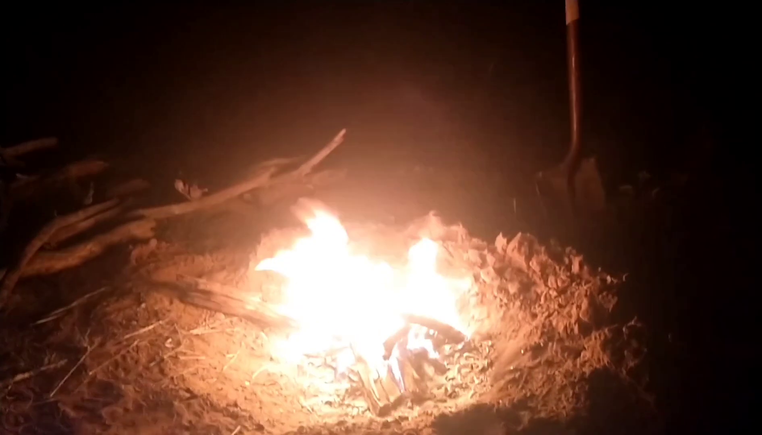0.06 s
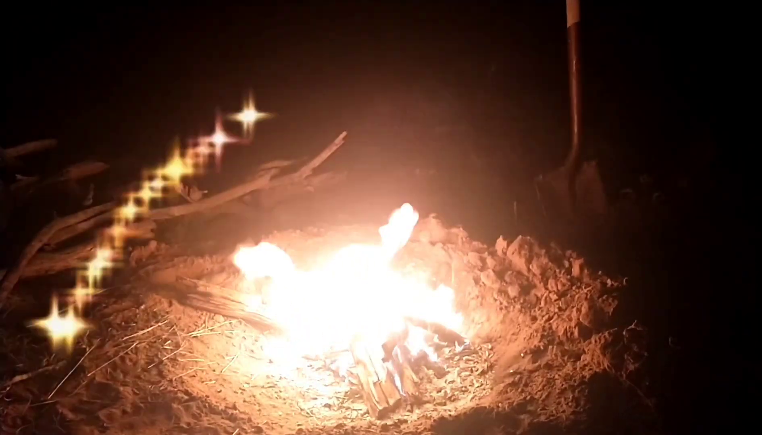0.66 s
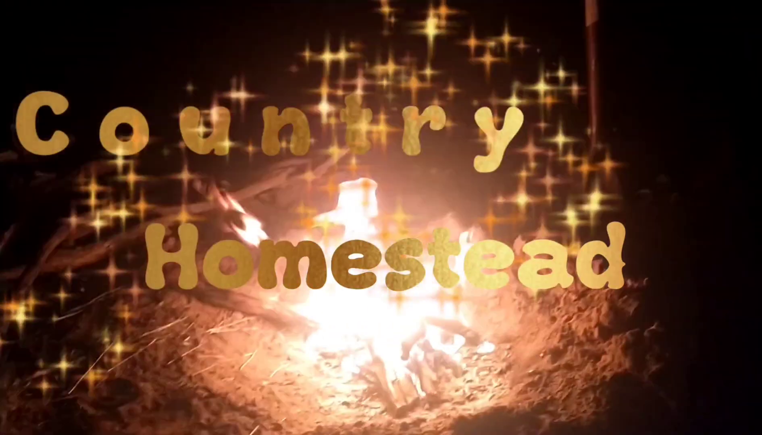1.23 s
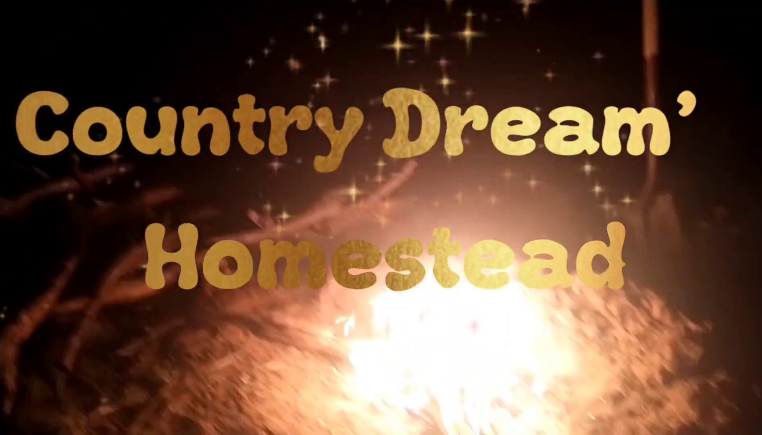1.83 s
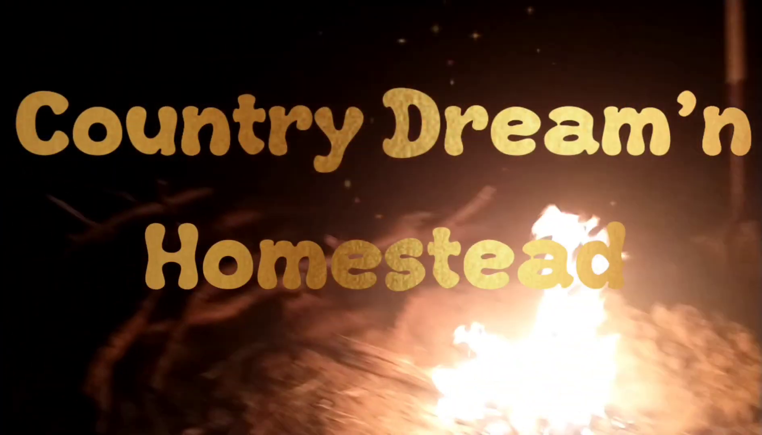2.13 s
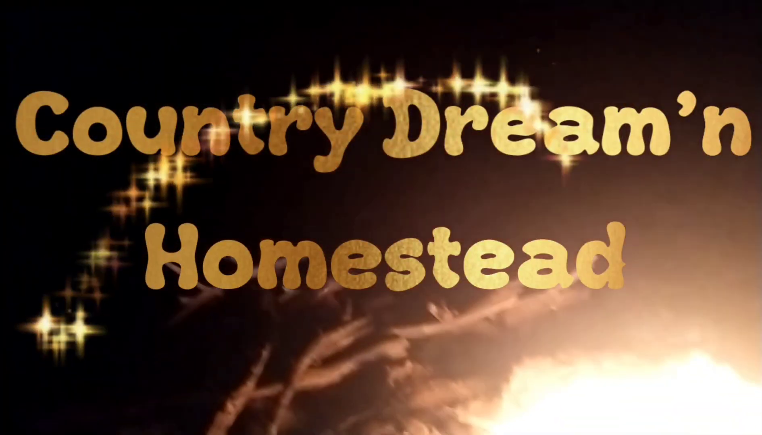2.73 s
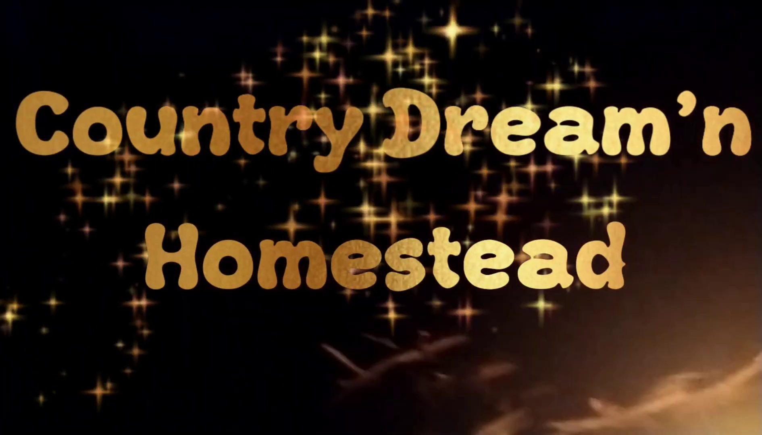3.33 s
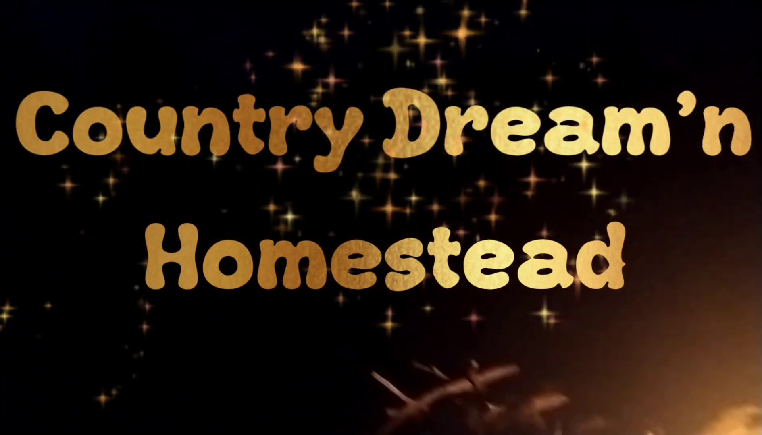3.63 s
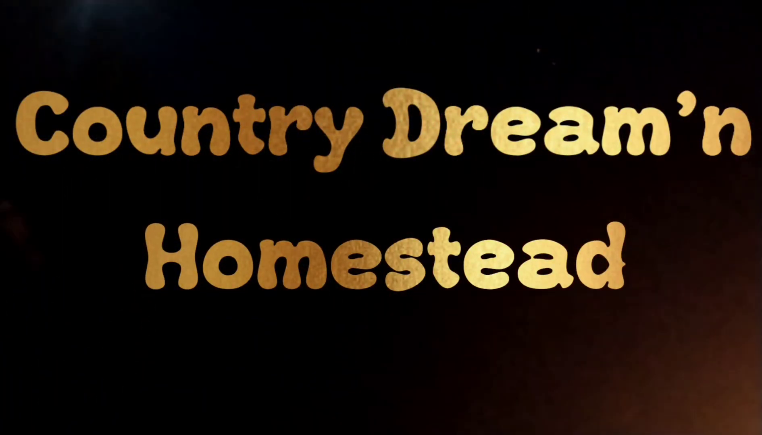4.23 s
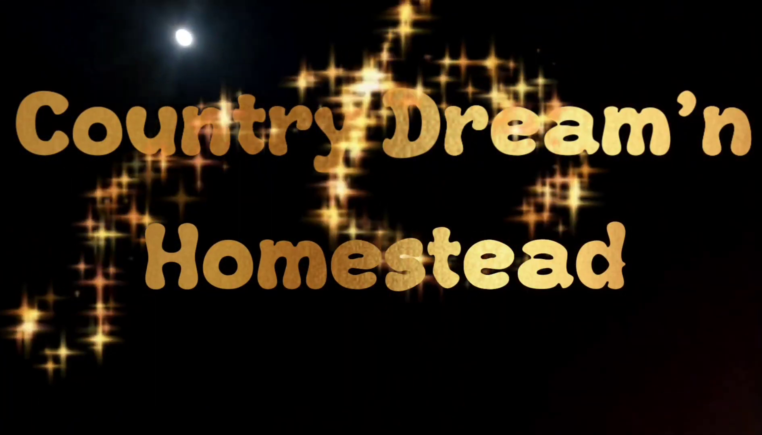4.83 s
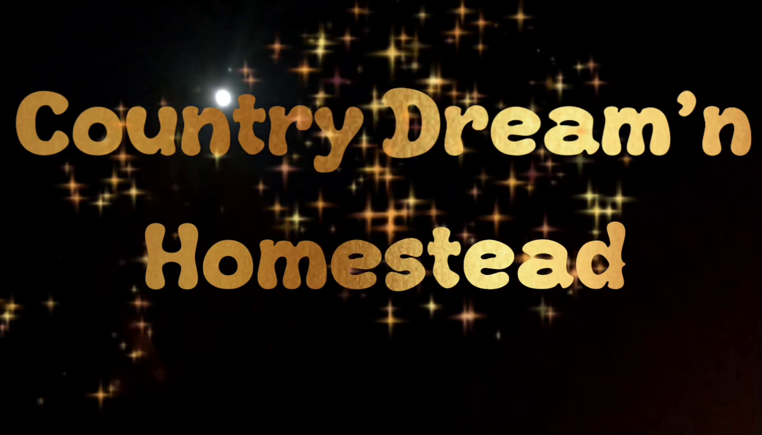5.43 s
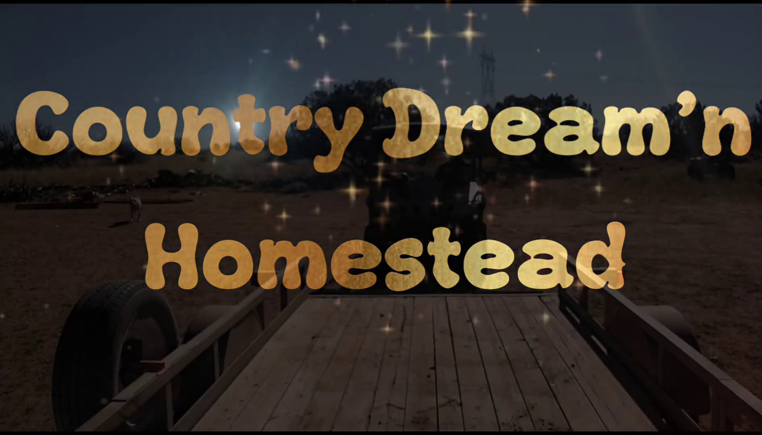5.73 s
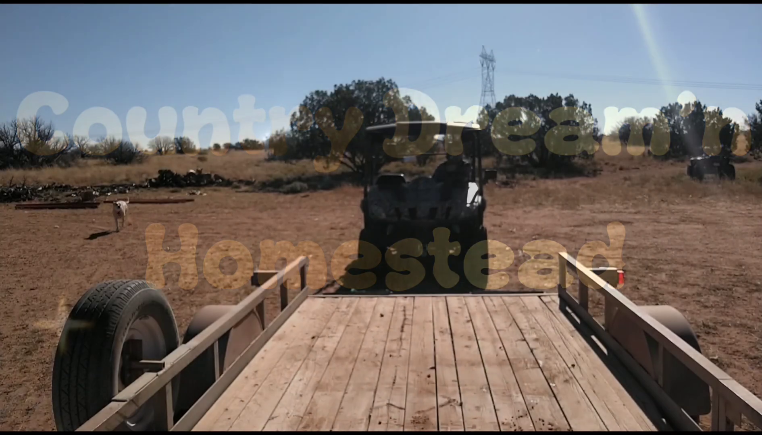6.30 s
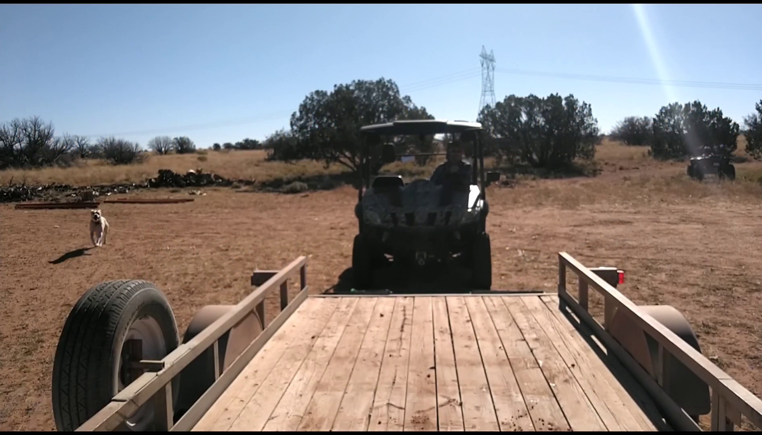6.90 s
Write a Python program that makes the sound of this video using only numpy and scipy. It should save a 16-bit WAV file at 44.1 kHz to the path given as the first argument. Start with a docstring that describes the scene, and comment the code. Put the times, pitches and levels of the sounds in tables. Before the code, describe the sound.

Crickets trill in a steady, high chorus outdoors at night while a small campfire flutters softly and gives scattered faint snaps. Midway, a few light knocks come through the microphone's casing. Near the end the crickets and fire fade as a utility cart creeps closer from straight ahead, its engine puttering and rattling, tyres grinding on dirt, and its brakes giving short, louder groans with thin squeaks.

```python
"""Tree crickets trill in chorus at night, each wing stroke a short falling tone.
A small campfire flutters as gas burns, hisses softly and snaps as sap pockets burst.
Light knocks come through the camera's casing, air nudges its microphones and a faint whistle sinks.
The night fades into a utility cart creeping closer: its engine putters, its tyres grind on dirt
and its brakes groan and squeak."""
import sys
import numpy as np
from scipy import signal
from scipy.fft import rfft, irfft, next_fast_len
from scipy.io import wavfile
from scipy.ndimage import map_coordinates

SR = 44100
rng = np.random.default_rng(int(sys.argv[2]) if len(sys.argv) > 2 else 0)


def bounce(signal):
    """Save signal as a 16-bit WAV file at the path given by the first command-line argument."""
    frames = np.transpose(np.atleast_2d(signal))
    limited = np.clip(frames, -1, 1)
    pcm = np.round(limited * 32767).astype(np.int16)
    wavfile.write(sys.argv[1], SR, pcm)


N = 306869
T = np.arange(N) / SR
START_S, THROTTLE_S = .13, 6.19  # the night sounds begin; the cart starts to roll
SWING_S = (3.6, 4.6)  # the camera swings away from the fire (from, to)
TOP_HZ = 15500

# Stereo width: how strong the side (what differs between the ears) is next to the mid (what they share).
# the fire sounds wide: (frequency [Hz], side over mid [dB])
FIRE_WIDTH = [(60, -8.5), (180, -11), (550, -5.5), (1650, -2.5), (4970, 0), (15000, 0.5)]
# the cart is straight ahead: (frequency [Hz], side over mid [dB])
CART_WIDTH = [(1000, -71)]


def amp(db):
    """Turn decibels into a gain."""
    return 10 ** (np.asarray(db) / 20)


def unit(x):
    """Scale a sound to an average (rms) level of 1."""
    return x / np.sqrt(np.mean(x ** 2) + 1e-20)


def along(points, hz):
    """Read between (frequency, value) points on a log frequency axis."""
    freqs, values = np.transpose(points)
    return np.interp(np.log(hz + 1), np.log(freqs + 1), values)


def swell(s, half):
    """A bell-shaped rise and fall around time s; half is its half length in seconds."""
    return np.exp(-.5 * np.minimum(((T - s) / half) ** 2, 100))


def ramp(start, end):
    """A straight rise from 0 to 1 between two times."""
    return np.clip((T - start) / max(end - start, 1e-3), 0, 1)


def between(pair, share):
    """Move from the first value of a pair to the second."""
    return pair[0] + (pair[1] - pair[0]) * share


def wobble(rate):
    """A smooth curve through `rate` random values a second."""
    return map_coordinates(rng.standard_normal(int(N * rate / SR) + 4), [T * rate])


def sine(hz):
    """A tone that follows a pitch curve."""
    return np.sin(2 * np.pi * np.cumsum(hz) / SR)


def filtered(x, response):
    """Multiply each frequency in x by response(hz)."""
    size = next_fast_len(N + 8192)
    return irfft(rfft(x, size) * response(np.fft.rfftfreq(size, 1 / SR)), size)[..., :N]


def noise(spectrum, width):
    """Stereo noise with a given tone colour and width."""
    lo, hi = spectrum[0][0], spectrum[-1][0]
    roll_off = lambda hz: np.minimum(1, hz / lo) ** 2 * np.minimum(1, hi / (hz + 1)) ** 2
    colour = lambda hz: amp(along(spectrum, hz) + np.outer([0, 1], along(width, hz))) * roll_off(hz)
    mid, side = filtered(rng.standard_normal((2, N)), colour)
    return np.array([mid + side, mid - side]) / np.std(mid)


def puffs(rows, width):
    """Short swells of noise, each about an octave wide."""
    return sum(amp(db) * swell(s, half) * noise([(hz / 2, -10), (hz, 0), (2 * hz, -12)], width)
               for s, hz, db, half in rows)


def ring_of(spectrum, size=16384):
    """How something with this tone colour rings after one tap."""
    cepstrum = irfft(np.log(amp(along(spectrum, np.fft.rfftfreq(size, 1 / SR))) + 1e-6))
    cepstrum[1:size // 2] *= 2  # folded forward, so nothing sounds before the tap
    cepstrum[size // 2 + 1:] = 0
    return irfft(np.exp(rfft(cepstrum)))


def panned(x, pan_db):
    """Place a sound at constant power; positive pan_db is to the left."""
    gains = np.array([amp(pan_db / 2), amp(-pan_db / 2)]).reshape(2, -1)
    return x * gains / np.sqrt(np.mean(gains ** 2, axis=0))


def add(track, s, sound):
    """Mix a short sound in at time s."""
    part = track[round(s * SR):][:len(sound)]
    part += sound[:len(part)]


def bursts(rows, ring_t60, crack_t60, crack_db):
    """A cavity cracks open and rings briefly; a t60 is the seconds taken to fade by 60 dB."""
    track, t = np.zeros(N), np.arange(SR // 20) / SR
    for s, db, hz in rows:
        ring = np.sin(2 * np.pi * hz * t) * amp(-60 * t / ring_t60)
        cavity = signal.butter(1, [hz / 2, min(hz * 1.15, TOP_HZ)], "bandpass", fs=SR)
        crack = unit(signal.lfilter(*cavity, rng.standard_normal(len(t)))) * amp(-60 * t / crack_t60)
        burst = ring + amp(crack_db) * crack
        add(track, s + .001, amp(db) * burst / np.abs(burst).max())
    return track


def echoes(x):
    """Ground and bushes scatter the sound, differently for each ear."""
    # how long the echo lasts: (frequency [Hz], time to fade by 60 dB [s])
    fade_times = [(200, 0.04), (3000, 0.99), (10000, 0.077)]
    hz, t, spectra = signal.stft(rng.standard_normal((2, SR // 3)), SR, nperseg=256)
    tail = signal.istft(spectra * amp(-60 * t / along(fade_times, hz)[:, None]), SR, nperseg=256)[1]
    return signal.fftconvolve(x[None], tail / np.linalg.norm(tail[0]), axes=1)[:, :N]


def whistle():
    """A faint, fuzzy tone sinks in the distance."""
    middle_s, sink_hz_per_s = 4.27, 330
    hz = 1210 - sink_hz_per_s * (T - middle_s)
    return amp(-79.5) * swell(middle_s, half=.15) * unit(sine(hz * (1 + .06 * wobble(220))))


def breeze():
    """Air nudges the microphone openings with soft, low thuds."""
    # nudges: (time [s], pitch [Hz], level [dB], half length [s])
    nudges = [(4.85, 71, -69.5, 0.05), (4.96, 73.8, -65, 0.027), (5.61, 83.5, -66.5, 0.022)]
    return puffs(nudges, width=[(100, 0)])


def knocks():
    """Each knock ticks on the camera's casing, makes it ring and rocks the microphones opposite ways."""
    # knocks: (time [s], level [dB], tick next to the ring [dB])
    taps = [(3.566, -37.5, -6), (3.622, -38.5, -9), (3.682, -40, -29), (3.745, -39, -24),
            (5.813, -40.5, -24), (5.887, -49.5, -25), (5.96, -51, -25)]
    # the casing's own notes: (pitch [Hz], level [dB], time to fade by 60 dB [s])
    casing_notes = [(383, -2.5, 0.04), (475, -1, 0.022), (945, 6.5, 0.0051), (1390, -4, 0.011),
                    (2230, 3, 0.0036)]
    mid, side, t = np.zeros(N), np.zeros(N), np.arange(SR // 10) / SR
    dulling = signal.butter(2, 8000, fs=SR)  # the casing softens each tick
    for s, db, tick_db in taps:
        notes = np.array([amp(level + rng.normal(0, 1) - 60 * t / t60) * np.sin(2 * np.pi * hz * t)
                          for hz, level, t60 in casing_notes])
        ring = notes.sum(0)
        side_ring = (-1) ** np.arange(len(notes)) @ notes  # every second note flipped
        size = amp(db) / np.abs(ring).max()
        crack = unit(signal.lfilter(*dulling, rng.standard_normal(len(t))))
        tick = amp(tick_db - 60 * t / .013) * crack
        rock = amp(-9 - 60 * t / .037) * np.sin(2 * np.pi * 150 * t)
        add(mid, s + .0015, size * (tick - ring))
        add(side, s + .0015, size * amp(6.5) * (rock + side_ring))
    # the small casing gives off no bass
    mid = signal.sosfilt(signal.butter(3, 250, "highpass", fs=SR, output="sos"), mid)
    return np.array([mid + side, mid - side]) + amp(-13.5) * echoes(mid)


def throttle(levels_db, rise_s=.014):
    """A level in dB that moves from idling to rolling as the cart's throttle opens."""
    # extra pushes on the throttle: (time [s], boost [dB], half length [s])
    pushes = [(6.434, 3, 0.02), (6.707, 2, 0.04), (6.81, 4, 0.09)]
    push_db = sum(db * swell(s, half) for s, db, half in pushes)
    return between(levels_db, ramp(THROTTLE_S, THROTTLE_S + rise_s)) + push_db


def exhaust(cycles):
    """Each firing of the engine sends one puff down the pipe."""
    # the pipe's tone colour: (frequency [Hz], level [dB])
    pipe_colour = [(10, -52.5), (21, -18), (43, -2.5), (64, -7.5), (85, 6.5), (107, 0), (128, -7.5),
                   (170, -22), (250, -11.5), (400, -18), (900, -74.5)]
    firings = np.diff(np.floor(cycles), prepend=np.floor(cycles[0])) * amp(1.4 * wobble(21))
    pipe = signal.fftconvolve(firings, ring_of(pipe_colour))[:N]
    muffled = filtered(pipe, lambda hz: 1 / (1 + (hz / 900) ** 4))
    return amp(throttle((-63, -52))) * unit(muffled)


def machinery(cycles):
    """Moving parts and the frame rattle in step with the engine while the gears whine."""
    # tone colours of the parts and the frame: (frequency [Hz], level [dB])
    parts_colour = [(250, -46.5), (420, -7), (514, -8), (600, -7), (971, -16.5), (1480, -19.5), (2380, -27),
                    (2620, -24), (3330, -28.5), (4200, -32), (5460, -42.5), (9240, -120)]
    frame_colour = [(60, -26.5), (130, 1.5), (260, 0.5), (380, 5.5), (460, -2.5), (650, -24)]
    # gear tones: (pitch [Hz], level next to the parts [dB])
    gear_tones = [(1814, -27), (2126, -24), (2581, -18.5), (3045, -25)]
    gears = sum(amp(db) * unit(sine(hz * (1 + .006 * wobble(110)))) for hz, db in gear_tones)
    rattle = noise(parts_colour, CART_WIDTH) + noise(frame_colour, CART_WIDTH)
    return amp(throttle((-66, -55)) + .88 * np.cos(2 * np.pi * cycles)) * (rattle + gears)


def tyres():
    """The tyres crush grit, picking up more slowly than the engine."""
    # the grit's tone colour: (frequency [Hz], level [dB])
    grit_colour = [(2240, -40), (3800, 2), (4380, -3), (4750, -3.5), (6410, -2), (7560, -6), (8160, -6.5),
                   (9510, -16), (12700, -16), (14600, -8.5), (15500, -29.5)]
    crunch = amp(throttle((-82.5, -73), rise_s=.051))
    scrape = amp(-69.5) * swell(6.268, half=.014)  # the brake pad lets go
    return (crunch + scrape) * amp(1.3 * wobble(300)) * noise(grit_colour, CART_WIDTH)


def cart():
    """The cart creeps into earshot: the low exhaust comes first, the rattle and grit after it."""
    # a pebble cracks under a tyre: (time [s], peak [dB], pitch [Hz])
    pebble = [(6.537, -48.5, 6900)]
    firing_hz = 21.35
    cycles = np.cumsum(firing_hz * (1 + .014 * wobble(9.4))) / SR
    cycles -= np.interp(6.539, T, cycles)  # one firing lands at this time
    nearing = ramp(5.466, 5.92)
    driving = nearing * exhaust(cycles) + nearing ** 2 * (machinery(cycles) + tyres())
    return driving + bursts(pebble, ring_t60=.002, crack_t60=.004, crack_db=3.5)


def brakes():
    """Each grab of the brake feeds one low note with a fast, rough tremble; thin squeaks sit on top."""
    # grabs: (time [s], hold [s], pitch [Hz], level [dB])
    grabs = [(6.229, 0.025, 336, -36.5), (6.382, 0.042, 331, -48), (6.65, 0.11, 330, -35),
             (6.688, 0.03, 327, -34.5), (6.78, 0.022, 329, -29), (6.827, .04, 368, -41.5),
             (6.899, 0.012, 388, -48.5)]
    # squeaks: (time [s], pitch [Hz], level [dB], half length [s])
    squeaks = [(6.272, 13506, -63.5, .018), (6.266, 15329, -69, .014), (6.28, 8280, -71, .02),
               (6.455, 3080, -65, .03), (6.775, 7950, -73, .025), (6.54, 612, -57, .03)]
    attack_s, release_s = .0129, .00813
    grips, pitches = [], []
    for s, hold, hz, db in grabs:
        freed = 1 - np.exp(-np.maximum(T - s - hold, 0) / release_s)
        grips.append(amp(db) * np.exp(np.minimum(T - s, 0) / attack_s) * (1 - freed))
        pitches.append(hz * (1 + .0615 * freed))  # the pitch rises as the pad lets go
    groan_hz = np.average(pitches, axis=0, weights=np.array(grips) + 1e-12)
    tremble = 1 + .2 * np.sin(2 * np.pi * 75 * T) + .12 * wobble(130)
    track = sum(grips) * tremble * unit(sine(groan_hz * (1 + .0122 * wobble(150))))
    scratch = 1 + .5 * wobble(700)
    for s, hz, db, half in squeaks:
        track += amp(db) * swell(s, half) * unit(scratch * sine(hz + .89 * np.sqrt(hz) * wobble(300)))
    return track


def high_hiss(surge_db, flicker):
    """A high hiss from the logs, blended with the crickets' blurred overtones near 6 and 7 kHz."""
    # log hiss and blurred cricket overtones together: (frequency [Hz], level [dB])
    blend_colour = [(2290, -13), (3900, -2), (4300, -3), (5390, -5.5), (5910, 1.5), (6440, -4.5),
                    (6950, -3.5), (8070, -7), (13900, -14.5), (14700, -14), (15500, -17.5)]
    # short spurts from the logs: (time [s], pitch [Hz], level [dB], half length [s])
    spurts = [(1.465, 6360, -71, 0.009), (1.67, 6040, -77, 0.047), (1.99, 5950, -76.5, 0.089),
              (3.1, 6160, -79.5, 0.19)]
    blend = amp(-81.5 + .21 * surge_db + .5 * flicker) * noise(blend_colour, FIRE_WIDTH)
    return panned(blend + puffs(spurts, FIRE_WIDTH), pan_db=-1)


def flames():
    """Burning gas rumbles, flutters and rushes under a high hiss. A surge lifts the rush most."""
    # tone colours of the flames: (frequency [Hz], level [dB])
    rumble_colour = [(15, -54), (25, -21), (45, -11), (92, 1), (220, -7), (290, -13), (480, -120)]
    flutter_colour = [(90, -16), (180, -2), (300, -2.5), (450, -9.5), (700, -15), (1300, -21)]
    rush_colour = [(300, -1.5), (700, 0), (1250, -2.5), (1700, -5), (2400, -5.5), (3800, -6.5), (6000, -60)]
    # surges: (time [s], added strength next to the calm fire [dB], half length [s])
    surges = [(.24, -4, 0.14), (1.668, 5.5, 0.17), (2.26, 3.5, 0.071), (2.6, 6.5, .13), (3.12, 4.5, 0.19),
              (4.23, -9, 0.24)]
    # soft flares: (time [s], pitch [Hz], level [dB], half length [s])
    flares = [(.23, 186, -76, 0.13), (1.635, 520, -65, 0.015), (1.64, 194, -68, 0.024),
              (1.688, 324, -63, 0.015)]
    surge_db = 20 * np.log10(1 + sum(amp(db) * swell(s, half) for s, db, half in surges))
    flicker = wobble(16)
    billow_db = 2.8 * wobble(14)
    rumble = amp(between((-75.5, -76), ramp(*SWING_S)) + billow_db) * noise(rumble_colour, FIRE_WIDTH)
    flutter = amp(-81 + .18 * surge_db + 1.6 * flicker) * noise(flutter_colour, FIRE_WIDTH)
    rush = amp(-82.5 + surge_db + 1.3 * flicker + 1.96 * wobble(170)) * noise(rush_colour, FIRE_WIDTH)
    return rumble + flutter + rush + high_hiss(surge_db, flicker) + puffs(flares, FIRE_WIDTH)


def crackle(tick_count=36):
    """Sap pockets burst with bright snaps; the embers add dull pops and tiny ticks, and one dull pop gives the
    loudest snap its low body."""
    # snaps and dull pops, one pop sitting under the snap at 5.65 s: (time [s], peak [dB], pitch [Hz])
    sap_snaps = [(1.373, -55.5, 8900), (1.4512, -55, 6400), (2.362, -59, 9000), (2.4553, -56.5, 8800),
                 (3.116, -54, 4500), (3.243, -54, 6460), (4.6133, -45, 7940), (5.5697, -62, 7260),
                 (5.6535, -42.5, 7670), (5.814, -49.5, 6030)]
    dull_pops = [(0.284, -56.5, 1510), (0.664, -65, 1100), (0.809, -62, 1290), (0.911, -60.5, 1610),
                 (2.448, -54, 1120), (3.248, -46.5, 2210), (3.376, -54.5, 1500), (3.728, -56, 799),
                 (4.031, -54.5, 1200), (5.653, -52.5, 2220)]
    when, size, pitch = rng.random((tick_count, 3)).T
    ticks = np.transpose([START_S + 5.8 * when, -70 + 9 * size, 900 + 7000 * pitch ** 2])
    direct = bursts(sap_snaps, ring_t60=.0037, crack_t60=.014, crack_db=-8.5)
    direct += bursts(dull_pops, ring_t60=.022, crack_t60=.014, crack_db=5)
    direct += bursts(ticks, ring_t60=.0024, crack_t60=.019, crack_db=8)
    return panned(direct + amp(-11.5) * echoes(direct), pan_db=-4.5)


def song(hz, rate, sweep, duty, overtone_db, jitter, spread_db):
    """One cricket: each wing stroke is a short tone that falls as the wing slows; no two are alike."""
    strokes = np.cumsum(rate * (1 + .006 * wobble(3))) / SR + rng.random()
    detune, size, phase = rng.standard_normal((1024, 3))[strokes.astype(int)].T
    progress = np.minimum(strokes % 1 / duty, 1)  # duty is the share of a stroke that sounds
    pitch = hz * (1 + sweep * (.5 - progress) + jitter * detune)
    angle = 2 * np.pi * (np.cumsum(pitch) / SR + phase)
    tone = np.sin(angle) + amp(overtone_db) * np.sin(2 * angle)
    return unit(np.sin(np.pi * progress) * amp(spread_db * size) * tone)


def chorus(group, level_db, pan_db, echo_db, **voice):
    """Distant crickets and their echoes; level and pan are pairs: before and after the camera swings."""
    direct = unit(sum(amp(db) * song(hz, rate, duty=.6, spread_db=1.16, **voice)
                      for hz, rate, db in group))
    scattered = np.array([unit(ear) for ear in echoes(direct)])
    blend = unit(direct + amp(echo_db) * scattered)
    swing = ramp(*SWING_S)
    return panned(blend, between(pan_db, swing)) * amp(between(level_db, swing))


def crickets():
    """A low and a high group trill and drift leftwards; two nearer crickets stand out in turn."""
    # the groups: (pitch [Hz], wing strokes [per s], level within the group [dB])
    low_group = [(2996, 43, -1.5), (2965, 44.5, -2), (2962, 37.2, -5), (3120, 40.5, -1.5), (3210, 50, -6.5),
                 (2737, 39, -11.5)]
    high_group = [(3392, 49.8, -5.5), (3482, 47.5, -6.5), (3420, 52, -5.5)]
    # near crickets: (pitch [Hz], wing strokes [per s], level [dB], loudest at [s], half length [s],
    # left over right [dB])
    near_pair = [(3032, 43, -62, 2.1, 1, 4.5), (3024, 45, -66.5, 4.77, 0.37, 6)]
    low = chorus(low_group, level_db=(-63, -64), pan_db=(.5, 4), echo_db=3,
                 sweep=.075, overtone_db=-27, jitter=.01)
    high = chorus(high_group, level_db=(-66, -67), pan_db=(-4.5, .5), echo_db=-5.5,
                  sweep=.055, overtone_db=-18, jitter=.007)
    near = 0
    for hz, rate, db, s, half, pan_db in near_pair:
        voice = song(hz, rate, sweep=.07, duty=.58, overtone_db=-27, jitter=.008, spread_db=1.6)
        near += amp(db) * swell(s, half) * panned(voice, pan_db)
    lead_s = 1e-4  # the sound reaches the left microphone this much before the right
    return filtered(low + high + near, lambda hz: np.exp(np.outer([1, -1], 1j * np.pi * hz * lead_s)))


def scene():
    """Crickets and flames fade away as the cart draws near."""
    fade_in, fade_out = ramp(START_S, START_S + .003), 1 - ramp(5.6, 6.53)
    night = breeze() + (crickets() + flames()) * fade_out + crackle() + knocks() + whistle()
    return night * fade_in + cart() + brakes()


def record(dry):
    """The camera keeps nothing above TOP_HZ."""
    return filtered(dry, lambda hz: hz < TOP_HZ)


dry = scene()
out = record(dry)
bounce(out)
```